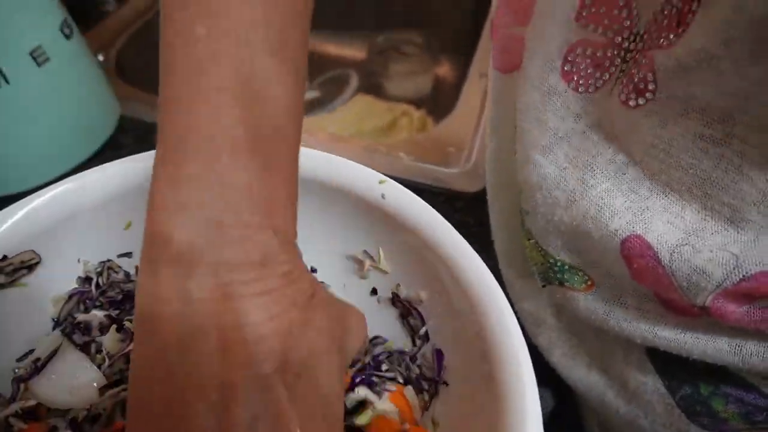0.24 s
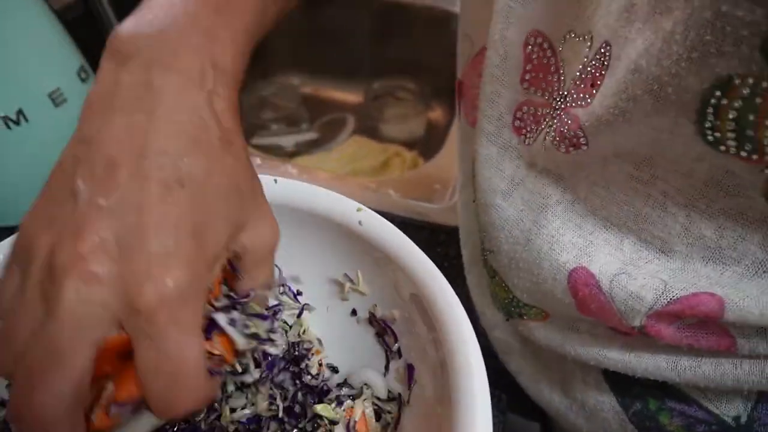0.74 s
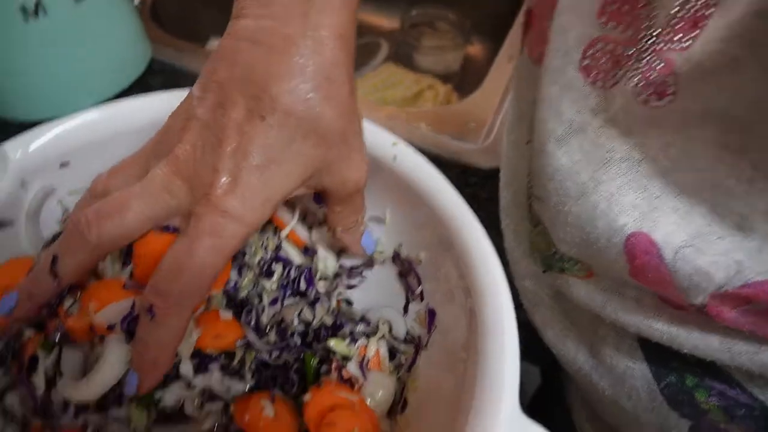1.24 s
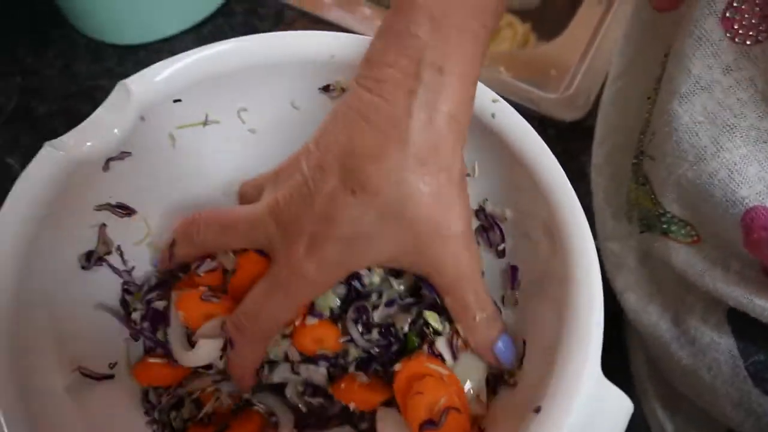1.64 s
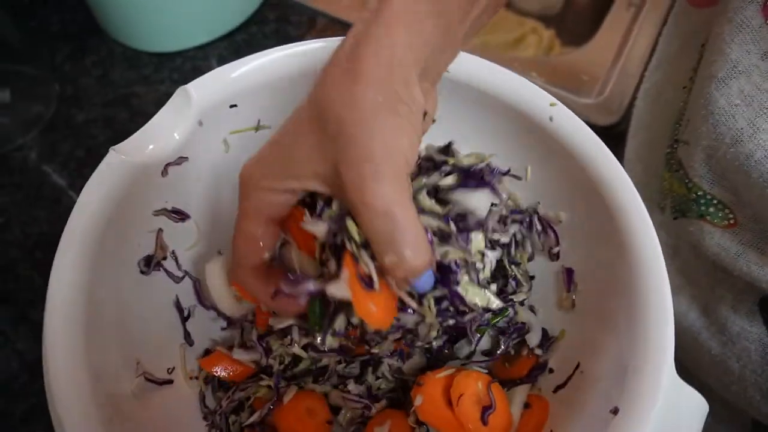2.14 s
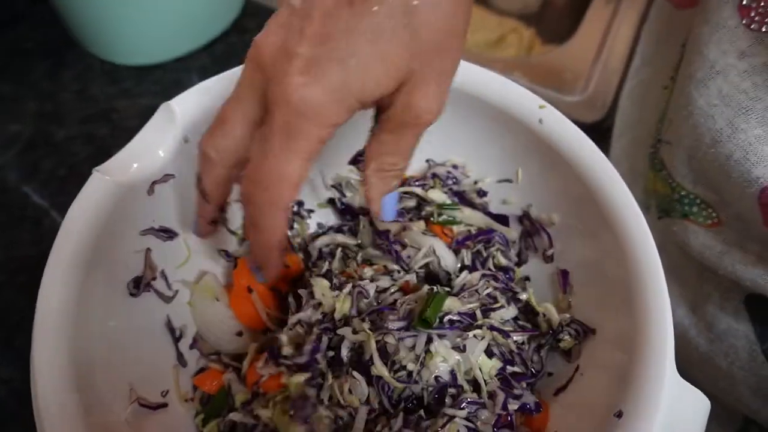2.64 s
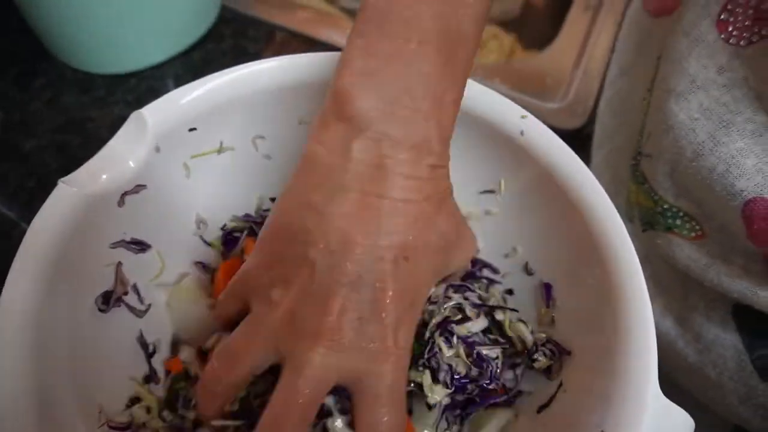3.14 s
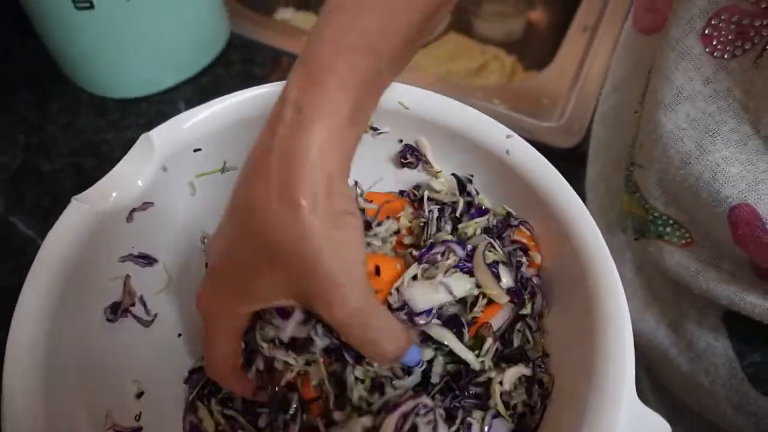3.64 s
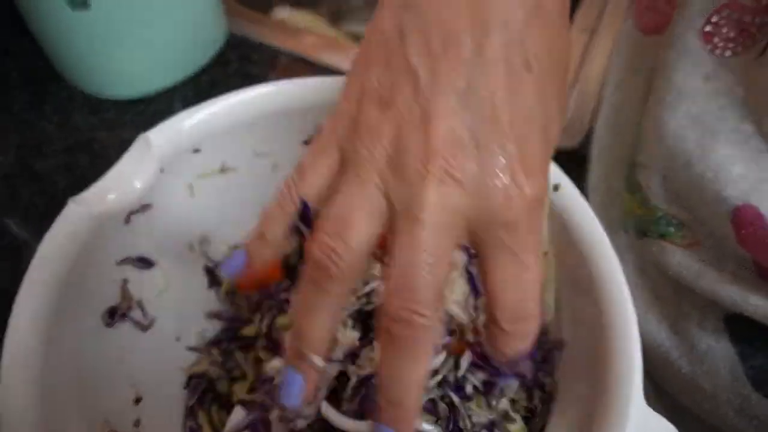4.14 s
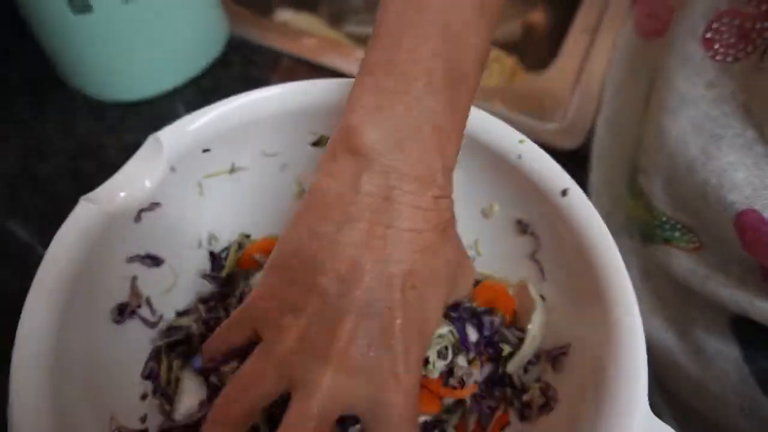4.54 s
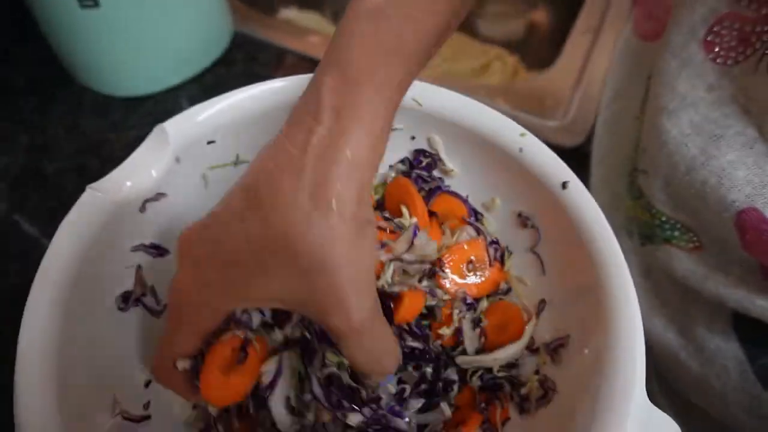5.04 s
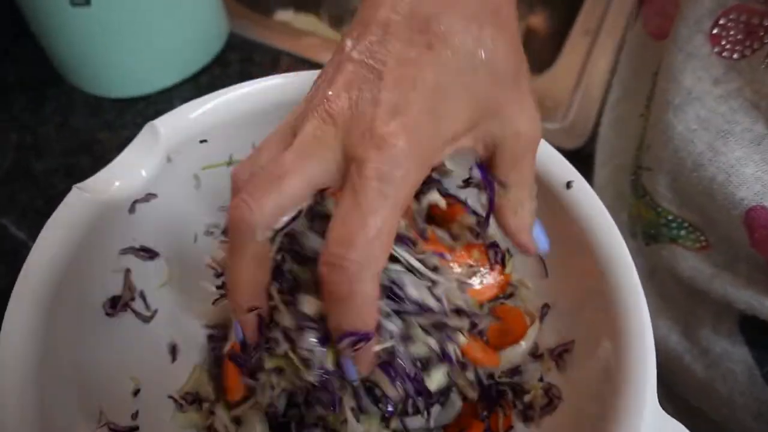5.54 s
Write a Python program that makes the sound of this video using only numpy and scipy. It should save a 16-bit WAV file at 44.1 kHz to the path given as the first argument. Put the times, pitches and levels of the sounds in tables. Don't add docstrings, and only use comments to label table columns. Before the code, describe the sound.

Close-up crunching of damp shredded vegetables: a squeeze almost at once, a second near two seconds, a long hard one around three and a half, and a short sharp one before five. Between them shreds drop lightly and fingers brush the heap. Soft plastic knocks, short indoor reflections, quiet room noise.

```python
import sys
import numpy as np
from scipy import signal
from scipy.fft import rfft, irfft, next_fast_len
from scipy.io import wavfile

SR = 44100
rng = np.random.default_rng(int(sys.argv[2]) if len(sys.argv) > 2 else 0)


def rack_gain(trim_db):
    fader = np.asarray(trim_db, float)
    return 10 ** (fader / 20)


def transcribe(u):
    v = np.clip(np.atleast_2d(u).T, -1, 1)
    q = np.round(v * 32767).astype(np.int16)
    wavfile.write(sys.argv[1], SR, q)


N = 255899
FIRM_GRIP_DB = -40.5
REST_HOLLOW_HZ = 2010


def rms_one(x):
    return x / np.sqrt(np.mean(x ** 2) + 1e-20)


def at_hz(points, hz):
    point_hz, point_db = np.transpose(points)
    return np.interp(np.log(hz), np.log(point_hz), point_db)


def drift(rate):
    r = np.exp(-16 * np.pi * rate / SR)
    white = rng.standard_normal(N // 8 + 4002)
    slow = signal.lfilter([1], [1, -2 * r, r * r], white)[4000:]
    return np.interp(np.arange(N) / 8, np.arange(len(slow)), rms_one(slow))


def resonate(x, hz, width_hz):
    r = np.exp(-np.pi * width_hz / SR)
    poles = [1, -2 * r * np.cos(2 * np.pi * hz / SR), r * r]
    return signal.lfilter([(1 - r * r) / 2, 0, (r * r - 1) / 2], poles, x + 1e-18)


def stereo(mid, side):
    return np.array([mid + side, mid - side])


def add(out, s, peak_db, sound):
    at = round(s * SR)
    piece = sound[..., max(-at, 0):N - at]
    start = max(at, 0)
    out[..., start:start + piece.shape[-1]] += piece * rack_gain(peak_db) / (np.abs(sound).max() + 1e-12)


def rustle(cracks_per_s, size_db, clump_db, cycles, hollow_db):
    # (frequency [Hz], level [dB per Hz])
    spectrum = [(260, -46), (450, -2.5), (679, -15), (1100, 0.5), (1220, 0), (2010, 7.5), (3210, 3.5),
                (4310, 0), (15000, -39.5)]
    # (frequency [Hz], side minus mid [dB])
    crack_spread = [(60, -22), (180, -20), (550, -25), (1650, -23), (4970, -11.5), (15000, -1.5)]
    pitches = np.geomspace(620, 14500, num=28)
    at = np.flatnonzero(rng.random(N) < cracks_per_s / SR)
    level_db, heavy_db, fine_db, hollow_hz = grip(at / SR)
    fine_db = np.maximum(fine_db, -21)
    lightness_db = np.clip(FIRM_GRIP_DB - level_db, 0, 14)
    hollow_db = hollow_db - 0.5 * (fine_db + 12.0) + 0.097 * lightness_db
    clump_db = clump_db * clumps(per_s=98.0, fade_ms=6.8)[at]
    size_db = size_db * np.minimum(rng.exponential(1, N), 4)[at]
    sign = rng.choice([-1, 1], N)[at]
    place = rng.standard_normal(N)[at]
    dealt = rng.integers(0, len(pitches), N)[at]
    patches = [drift(16)[at] for k in range(6)]
    out = 0
    for k, hz in enumerate(pitches):
        heavy = np.clip(np.log2(hollow_hz / hz), 0, 1)
        fine = np.clip(0.81 * np.log2(hz / 3000), 0, 1)
        shaken = np.abs(dealt - k) <= 2
        cracks = shaken * sign * rack_gain(size_db + clump_db + 1.2 * patches[k // 2 % 6])
        grip_db = level_db + heavy * (heavy_db + 14.0) + fine * (fine_db + 14.0) + at_hz(spectrum, hz)
        grip_db = grip_db + hollow_db * np.exp(-(np.log2(hz / hollow_hz) / .2) ** 2)
        side = place * rack_gain(at_hz(crack_spread, hz))
        pair = np.zeros((2, N))
        pair[:, at] = rms_one(cracks) * rack_gain(grip_db) * stereo(0.74, side)
        band = signal.butter(2, [hz / 1.13, hz * 1.211], "band", fs=SR, output="sos")
        out = out + signal.sosfilt(band, resonate(pair, hz, hz / cycles))
    return out * rack_gain(9.0) * np.sqrt(SR / cracks_per_s)


def clumps(per_s, fade_ms):
    starts = (rng.random(N) < per_s / SR) * np.minimum(rng.exponential(1, N), 2.5)
    fading = signal.lfilter([1], [1, -np.exp(-1000 / (fade_ms * SR))], starts)
    surge = np.log(0.63 + fading)
    return rms_one(surge - surge.mean())


def grip(at_s):
    # (time [s], rustle level [dB], hollow under the hand [Hz])
    first_squeeze = [(0.15, -72, 2200), (0.225, -55.5, 2150), (0.265, -43, 2070), (0.4, -36.5, 1920),
                     (0.53, -45.5, 2000), (0.64, -64, 2250), (0.74, -67.5, 2300), (0.8, -69, 2200),
                     (1.0, -85, 2040)]
    second_squeeze = [(1.5, -65.5, 1900), (1.679, -44, 1980), (1.76, -51, 1710), (1.826, -42.5, 1850),
                      (1.86, -35.5, 1990), (1.96, -41.5, 1820), (2.119, -53.5, 2000), (2.19, -55, 2080),
                      (2.46, -72.5, 1990)]
    third_squeeze = [(3.005, -80, 1890), (3.049, -61.5, 1680), (3.15, -44.5, 2160), (3.38, -38.5, 1880),
                     (3.469, -34.5, 1680), (3.6, -46, 1630), (3.7, -53, 1600), (3.84, -75.5, 1660),
                     (3.969, -70.5, 2120)]
    fourth_squeeze = [(4.25, -102, 1850), (4.42, -54, 1970), (4.7, -46.5, 2080), (4.767, -41, 1920),
                      (4.79, -33, 2110), (4.867, -41.5, 1600), (5.09, -52.5, 1580), (5.13, -60.5, 2130),
                      (5.37, -75, 2070)]
    # (heavy wet pieces [dB above rustle], fine dry shreds [dB above rustle],
    # dulling once crushed [dB per s])
    handfuls = [
        (-15, -10, 1),
        (-12, -10, 12),
        (-22, -10, 63),
        (-15.5, -14, 10.5),
    ]
    # (touch [s], rustle level [dB], time to fall 20 dB [s], hollow [Hz],
    # fine shreds [dB above rustle])
    brushes = [(0.031, -51.5, 0.07, 2300, -31), (0.17, -53, 0.32, 2200, -14),
               (0.602, -49.5, -0.0854, 2260, -11), (0.675, -61, 0.04, 2300, -14),
               (0.73, -70, -0.35, 2300, -4), (0.94, -69, -0.9, 2200, -10), (1.133, -55, 0, 2070, -28),
               (1.169, -61, -0.26, 2090, -22), (1.224, -57, -0.79, 1990, -17),
               (1.572, -51, 0.97, 2200, -16), (1.71, -37.5, 0.01, 2200, -10.5),
               (2.17, -54.5, 0.17, 2120, -9), (2.647, -58, 0.05, 2200, -46), (4.548, -47, 0.3, 2120, -14),
               (0.12, -56.5, 0.64, 2320, -15), (0.818, -62, 0.28, 1700, -17), (0.901, -70, 0.26, 2080, -12),
               (1.084, -64, 0, 2080, -15), (1.112, -59, 0, 1940, -26), (1.197, -57.5, -0.06, 1940, -31),
               (1.467, -57.5, 0.15, 1800, -26.5), (2.32, -62.5, 0.64, 2140, 9.5),
               (2.518, -53.5, 0.08, 1830, -1), (2.589, -54, 0, 2100, -40),
               (2.612, -44.5, 0.0661, 2100, -10), (2.77, -63, -1.7, 2160, -21),
               (2.882, -63.5, 0, 1840, -15), (3.003, -50, 0.96, 1760, -12), (3.705, -50, 0.105, 1750, -14),
               (3.929, -60, 0, 2170, -2), (4.014, -58, 0.11, 1910, -3), (4.099, -57, 0, 2020, -10),
               (4.328, -62, 0.5, 1870, -20), (5.46, -65, 0.65, 1900, -5.5), (5.601, -57, 0.05, 1740, 6),
               (5.716, -67, -0.25, 2120, -11), (5.8, -71, 2, 2000, -15)]
    t = np.arange(0, N / SR + .002, .001)
    steady = np.ones(len(t))
    # level, heavy and fine shares [dB], hollow [Hz]
    parts = [(-77 * steady, -19 * steady, -9 * steady, REST_HOLLOW_HZ * steady)]
    squeezes = (first_squeeze, second_squeeze, third_squeeze, fourth_squeeze)
    for curve, (heavy_db, fine_db, dull_db) in zip(squeezes, handfuls):
        s, db, hz = np.transpose(curve)
        level_db = np.interp(t, s, db, left=-150, right=-150)
        firm_db = level_db - FIRM_GRIP_DB
        crushed_s = np.maximum(t - s[np.argmax(db)], 0)
        heavy_db = heavy_db + 0.26 * firm_db
        fine_db = fine_db - 0.15 * firm_db - dull_db * crushed_s
        parts.append((level_db, heavy_db, fine_db, np.interp(t, s, hz)))
    for s, db, fall_s, hz, fine_db in brushes:
        rise_s = 0.028
        level_db = db - 20 * np.where(t < s, (s - t) / rise_s, (t - s) / max(fall_s, .005))
        heavy_db = -18 - 35 * np.log2(hz / REST_HOLLOW_HZ)
        parts.append((level_db, heavy_db * steady, fine_db * steady, hz * steady))
    level_db, *colour = np.transpose(parts, (1, 0, 2))
    power = rack_gain(2 * level_db)
    total = power.sum(axis=0)
    mixed = [10 * np.log10(total)] + [(power * c).sum(axis=0) / total for c in colour]
    return [np.interp(at_s, t, c) for c in mixed]


def snaps():
    # (frequency [Hz], width [Hz], level [dB])
    bowl_air = [(2200, 56, 31.5), (3320, 150, 2), (4230, 100, -5), (1600, 650, 9.5)]
    out, lead_s = np.zeros((2, N)), .012
    ms = 1000 * (np.arange(2200) / SR - lead_s)
    after = ms >= 0
    for s, peak_db, hz, crack_db, rise_ms, fall_ms in strands():
        draw = rng.standard_normal((3, len(ms)))
        shape_db = -8. * np.where(ms < 0, -ms / max(rise_ms, .05), ms / max(fall_ms, .1))
        volley = draw[0] * rack_gain(1.94 * np.clip(draw[1], -3, 1.5) + shape_db)
        volley[np.argmax(after)] *= 2.2 / abs(draw[0, after][0])
        body = rms_one(resonate(resonate(volley, hz, hz / 4), hz, hz))
        air = 0
        for k, (air_hz, width_hz, db) in enumerate(bowl_air):
            air = air + rack_gain(db) * resonate(volley, air_hz, width_hz) * (-1) ** k
        crack = resonate(resonate(volley, 4100, 3800), 5150, 4600)
        lean = np.clip(draw[2, :2], -1.5, 1.5)
        low = signal.sosfilt(snap_band(hz), body + 0.33 * rms_one(air))
        add(out, s - lead_s - .0006, peak_db - 3.5, stereo(low, 0.15 * lean[0] * low))
        add(out, s - lead_s, peak_db + crack_db + 1.5, stereo(crack, lean[1] * np.roll(crack, 1)))
    return out


def strands():
    # (time [s], peak [dB], ring [Hz], fall [ms])
    breaks = [(0.1086, -27.5, 2270, 3), (0.192, -32.5, 2680, 2.3), (0.246, -28, 2250, 2.7),
              (0.2612, -21, 1950, 1.9), (0.3691, -18, 1830, 5), (0.396, -25.5, 3550, 1.7),
              (0.4999, -17, 2420, 4), (0.5225, -21.5, 3150, 0.85), (1.1209, -36.5, 1870, 0.3),
              (1.198, -57, 2190, 0.53), (1.8, -29, 2270, 1.4), (1.9464, -17.5, 2150, 0.25),
              (1.978, -25, 3500, 1.3), (2.002, -29, 1820, 8.5), (2.0852, -29, 3120, 0.72),
              (2.771, -43.5, 2330, 4.2), (3.0725, -34, 1730, 37), (3.336, -18.5, 1820, 3.3),
              (3.408, -21.5, 2720, 1.5), (3.4571, -18, 3200, 7), (3.472, -19.5, 2090, 1.1),
              (3.5198, -26, 1600, 42), (3.5396, -19, 1910, 0.58), (3.616, -35, 1790, 0.33),
              (3.6393, -19, 1850, 0.3), (3.9348, -39.5, 2080, 1.7), (4.664, -23, 1830, 2.7),
              (4.78, -24, 2560, 3.1), (4.891, -45, 1940, 3.5), (5.0025, -31.5, 2850, 4.7)]
    # (time of peak [s], peak [dB], ring [Hz], rise [ms], fall [ms])
    tears = [(0.0278, -28, 2230, 1.6, 3.5), (0.2896, -24.5, 2000, 5.1, 1.9),
             (0.3233, -21.5, 2200, 2.9, .57), (0.599, -40.5, 2360, 1.2, 1.2),
             (0.8216, -39, 1630, 2.9, 0.53), (0.9238, -45.5, 2200, 4.1, 0.53), (1.872, -30, 2980, 3.5, .6),
             (1.9119, -23, 3300, 8.3, 5.6), (2.4033, -44, 1890, 1.3, 2.6), (2.6087, -28, 2520, 0.35, 2.5),
             (2.618, -26.5, 2350, 1.2, 1.8), (2.8834, -44.5, 1930, 0.98, 0.58),
             (3.114, -27.5, 2120, 1.2, .7), (3.2394, -28.5, 2380, 0.91, 4), (3.261, -41, 2160, 3.2, 3.9),
             (3.309, -24, 1900, 0.64, 0.94), (3.382, -25, 2310, 1.4, .4), (3.431, -14.5, 4100, 4.2, 5.5),
             (4.1204, -36, 2380, 2.6, 0.78), (4.298, -42, 2120, 0.79, 2.8), (4.7112, -28, 2560, 1.4, 8.2),
             (4.832, -28, 2500, 1.8, 2.1), (4.9235, -26, 1740, 0.77, 1.1), (4.9447, -28, 3530, 3.9, 0.97)]
    # (time [s], peak [dB], ring [Hz], crack [dB above peak], fall [ms])
    ticks = [(0.0056, -39.5, 2200, -9, 6), (0.297, -28.5, 5200, -12, 14), (0.764, -46.5, 3000, -18, 2.3),
             (1.325, -54, 9300, -22, 1.1), (1.836, -22, 3320, -9, 0.97), (1.853, -27.5, 4400, -6, 0.71),
             (1.936, -37, 4040, -37, 0.36), (2.055, -36.5, 2260, -7, 3.1), (2.2211, -40, 3500, -10, 1.8),
             (2.319, -38.5, 2100, -6.5, 1.9), (2.335, -40, 2100, -12, 3.8), (2.4749, -35, 2780, -4.5, 1.6),
             (2.5233, -42, 4120, 4.5, 1.5), (3.1460, -17.5, 2490, -6.5, 5.9), (3.78, -45, 1600, -2.5, 3),
             (3.797, -43, 4770, -18, 3.5), (4.1078, -50, 1950, -13, 5.6), (4.582, -37.5, 2250, -1, 0.76),
             (4.7006, -25.5, 2680, -13, 4), (4.773, -29, 3020, -13, 0.53), (5.2473, -35.5, 2170, -15, 4.1),
             (5.498, -49.5, 6500, -3, 2.9), (5.599, -42, 3080, 6, 2.2), (5.625, -45, 5600, -2, 4.4)]
    # (time [s], peak [dB], ring [Hz])
    landings = [(0.2793, -35, 6800), (0.717, -50, 3880), (0.732, -45.5, 3630), (1.4975, -55.5, 7500),
                (1.984, -32, 3470), (2.136, -35, 2870), (2.264, -46.5, 6000), (3.7, -57.5, 8000),
                (2.63, -31.5, 2280), (2.7357, -51, 3370), (3.1295, -33, 2150), (3.893, -44.5, 2200),
                (3.3, -52, 1800), (4.6205, -30, 2640), (4.6414, -40, 2530), (5.023, -41, 6560),
                (5.387, -52, 2980), (5.4607, -47, 1861), (5.4715, -49, 3950), (5.512, -40, 3640),
                (5.713, -46.5, 2800), (5.8008, -43, 2630)]
    break_rise_ms = 0.15
    rows = [(s, db, hz, -34, break_rise_ms, fall) for s, db, hz, fall in breaks]
    rows += [(s, db, hz, -33, rise, fall) for s, db, hz, rise, fall in tears]
    rows += [(s, db, hz, crack, break_rise_ms, fall) for s, db, hz, crack, fall in ticks]
    for s, db, hz in landings:
        crack_db = -14 - 16 * np.log2(hz / REST_HOLLOW_HZ)
        rows.append((s, db, hz, crack_db, break_rise_ms, 2.9))
    return rows


def snap_band(hz):
    return signal.butter(2, [900, max(6000, 0.8 * hz)], "band", fs=SR, output="sos")


def pops():
    # (time [s], peak [dB], ring [Hz])
    fibre_pops = [(0.0053, -51, 2130), (0.0091, -34, 2200), (0.0642, -55, 2130), (0.1705, -39, 3160),
                  (0.3094, -29, 2240), (0.3266, -30, 2290), (0.373, -29, 2220), (0.3987, -19.5, 3560),
                  (0.5626, -39, 2800), (0.814, -43.5, 2970), (1.1036, -42, 1870), (1.1108, -48, 1940),
                  (1.129, -45, 2000), (1.1739, -51, 2040), (1.1976, -49, 2150), (1.2074, -47, 2130),
                  (1.2181, -49, 2050), (1.2271, -53, 2020), (1.6596, -29, 2500), (1.712, -36, 1750),
                  (1.8698, -25.5, 3250), (1.927, -25, 2110), (1.9362, -36, 4000), (1.9414, -23.5, 3230),
                  (1.9918, -31, 2390), (2.0913, -37, 2640), (2.5002, -43, 2250), (2.6446, -39, 3180),
                  (2.6531, -40.5, 2300), (2.781, -57, 2300), (3.0018, -36, 3460), (3.2041, -31, 2150),
                  (3.2395, -34, 2400), (3.2592, -30, 2240), (3.3969, -29, 2650), (3.4175, -26, 2970),
                  (3.4365, -14, 2870), (3.4692, -18, 2060), (3.4964, -30, 1670), (3.6144, -28, 1700),
                  (3.67, -35, 1910), (3.6925, -42, 2110), (3.9401, -43.5, 2230), (4.2547, -52.5, 1840),
                  (4.3547, -45, 1830), (4.5829, -40, 2670), (4.6425, -35, 1850), (4.7052, -38, 2740),
                  (4.7613, -37, 3020), (4.7725, -35, 2950), (4.7787, -26, 2600), (4.8897, -28, 1800),
                  (4.993, -35.5, 1910), (5.0002, -30.5, 1740), (5.0354, -40, 1940), (5.749, -51, 2240),
                  (5.7992, -58, 1940)]
    # (time [s], peak [dB], ring [Hz])
    fibre_pricks = [(0.0063, -48.5, 5490), (0.1086, -42, 4640), (0.1121, -51, 4760), (0.599, -48, 5120),
                    (0.7619, -61, 5770), (0.8187, -57, 9450), (0.9472, -53.5, 4820), (1.0826, -50, 4500),
                    (1.7227, -45, 4640), (1.8362, -35, 4700), (1.8531, -25.5, 4500), (2.0557, -43, 5430),
                    (2.0933, -50, 5430), (2.3131, -52, 6100), (2.4159, -50.5, 6910), (2.6162, -35.5, 4770),
                    (2.7059, -56, 5040), (2.884, -54, 4470), (3.1312, -32, 5960), (3.2001, -31.5, 4500),
                    (3.3373, -29.5, 4720), (3.5545, -44, 5750), (3.7054, -56, 5320), (3.8553, -53, 4870),
                    (3.8838, -53, 4850), (3.9342, -46, 4640), (3.9509, -54, 4960), (4.1065, -51, 6560),
                    (4.2968, -55, 4900), (4.6001, -49, 5000), (4.642, -37, 4500), (4.646, -44, 5430),
                    (4.7054, -37, 5400), (4.7089, -31.5, 4770), (4.7613, -40, 4500), (4.7725, -29, 5120),
                    (4.8311, -32.5, 4970), (4.8526, -42, 6070), (4.8927, -41, 4750), (5.0224, -45, 5460),
                    (5.1452, -52, 4770), (5.215, -51, 5260), (5.3534, -59, 5400), (5.3829, -54.5, 6540),
                    (5.551, -57, 10800), (5.5989, -37.5, 9800), (5.6755, -53, 6760)]
    out, ms = np.zeros((2, N)), 1000 * np.arange(500) / SR
    kinds = ((fibre_pops, 6.8, -2, 0.15), (fibre_pricks, 6.4, 1.5, 0.6))
    for rows, cycles, trim_db, spread in kinds:
        for s, peak_db, hz in rows:
            draw = rng.standard_normal(len(ms) + 1)
            click = 0.36 * draw[1:] * np.exp(-ms / 0.52)
            click[0] = 1.27
            ring = resonate(resonate(click, hz, hz / cycles), hz, 0.72 * hz)
            ring = resonate(ring, hz, 1.75 * hz)
            side = spread * np.clip(draw[0], -1.5, 1.5) * np.roll(ring, 1)
            add(out, s, peak_db + trim_db, stereo(ring, side))
    return out


def slides():
    # (time [s], length [s], peak [dB], hollow [Hz])
    finger_slides = [
        (0.03, 0.054, -51, 2200),
        (0.112, 0.21, -42, 2200),
        (0.816, 0.068, -54, 1980),
        (2.156, 0.057, -47.5, 2150),
        (2.175, 0.025, -43.5, 3560),
        (2.244, 0.033, -54, 2120),
        (3.693, 0.042, -41, 1740),
        (4.801, 0.028, -27, 1420),
        (4.789, 0.03, -27, 2650),
        (5.04, 0.051, -48, 1620),
    ]
    out = np.zeros((2, N))
    slips_per_s, width_hz = 900., 270
    for s, length_s, peak_db, hz in finger_slides:
        draw = rng.random((2, 8000))[:, :round(length_s * SR)]
        slips = (draw[0] < slips_per_s / SR) * (2 * draw[1] - 1)
        slips = slips * signal.windows.tukey(draw.shape[1], 0.3)
        squelch = resonate(resonate(slips, hz, width_hz), hz, 2 * width_hz)
        add(out, s, peak_db, stereo(squelch, 0.091 * np.roll(squelch, 3)))
    return out


def knocks():
    # (time [s], peak [dB], strongest ring [Hz], counter thud [dB above peak],
    # fall of other modes [dB per octave])
    blows = [(0.259, -31, 1140, -44, 7.5), (0.316, -47, 557, -52, 15), (0.369, -25.5, 1140, -62, 10.5),
             (0.544, -57, 297, -49, 7), (0.967, -61.5, 385, -16, 29), (2.053, -48, 1050, -53, 35),
             (2.263, -56.5, 627, -48, 12), (2.337, -58, 613, -47, 38), (2.524, -41.5, 673, -54, 49),
             (2.618, -62.5, 388, -14, 7), (2.884, -58.5, 840, -10.5, 15), (2.998, -49.5, 374, -22, 10),
             (3.013, -43, 355, -10.5, 12), (3.075, -55.5, 500, -40, 25), (3.112, -54.5, 620, -40, 29),
             (3.43, -58, 612, -60, 32), (3.467, -46.5, 1110, -67, 10.5), (3.47, -47, 615, -60, 35),
             (3.515, -52.5, 620, -60, 37), (4.448, -50, 350, -6, -3)]
    # (frequency [Hz], width [Hz], side over mid [ratio])
    wall_modes = [(273, 61, 0.19), (387.5, 15, 0.11), (479, 10.6, 0.41), (537.4, 21, 0.28),
                  (613, 31.6, 0.25), (840, 95, 0.24), (1140, 58, 0.25), (1660, 47, 0.064)]
    out, age = np.zeros((2, N)), np.arange(8000) / SR
    steep = signal.butter(3, 250, "high", fs=SR, output="sos")
    for s, peak_db, spot_hz, thud_db, focus_db in blows:
        blow = rng.standard_normal(len(age)) * rack_gain(-60 * age / .01)
        wall = 0
        for k, (hz, width_hz, side) in enumerate(wall_modes):
            mode = rms_one(resonate(blow, hz, width_hz)) * rack_gain(-focus_db * abs(np.log2(hz / spot_hz)))
            wall = wall + (-1) ** k * stereo(mode, side * np.roll(mode, round(SR / hz / 6)))
        thud = rms_one(resonate(blow, 126, 6.8))
        thud = thud + 0.48 * rms_one(resonate(blow, 79, 5.4))
        thud = thud - 1.4 * rms_one(resonate(blow, 225, 20))
        judder = rng.standard_normal(len(age)) * rack_gain(-60 * age / 0.63)
        thud = resonate(thud + rms_one(resonate(judder, 180, 220)), 140, 230)
        add(out, s, peak_db, signal.sosfilt(steep, wall))
        add(out, s, peak_db + thud_db - 5.5, stereo(thud, 0.025 * thud))
    return out


def rocking(level_db):
    grip_db = grip(np.arange(N) / SR)[0]
    rumble = rms_one(resonate(resonate(rng.standard_normal(N), 94, 120), 66, 160))
    return rumble * rack_gain(level_db + 0.32 * (grip_db + 43) + 2 * drift(7.4))


def kitchen(x):
    t60_s, wall_cut_hz = .2, 5000
    size = next_fast_len(N + SR // 2)
    hz = np.fft.rfftfreq(size, 1 / SR)
    out = np.zeros((2, size // 2 + 1), complex)
    for k, lag_s in enumerate(rng.uniform(.006, .03, 12)):
        absorption = rack_gain(-60 * lag_s / t60_s) / (1 + 1j * hz / wall_cut_hz)
        loop = absorption * np.exp(-2j * np.pi * hz * lag_s)
        out[k % 2] += loop / (1 - loop) * (-1) ** (k // 2)
    return irfft(out * rfft(x, size), size)[:, :N]


def room_tone():
    # (frequency [Hz], level [dB per Hz])
    hiss = [(15, -65), (25, -23), (102, -26), (317, -9), (476, -2.5), (560, -2.5), (863, -8.5), (1230, -6),
            (1890, -24), (2160, -9.5), (4870, -12), (14800, -24), (16000, -35)]
    # (frequency [Hz], side minus mid [dB])
    hiss_spread = [(60, -9), (180, -8), (550, -6), (1650, -6), (4970, -4), (15000, -1)]
    # (frequency [Hz], width [Hz], level [dB])
    drone = (482, 28, -85)
    out, bounds = 0, 22 * 2 ** np.arange(0, 9.6, .5)
    white = rng.standard_normal((2, 2, N))
    for k, (low, high) in enumerate(zip(bounds, bounds[1:])):
        band = signal.butter(2, [low, high], "band", fs=SR, output="sos")
        mid, side = signal.sosfilt(band, white[k % 2])
        hz = np.sqrt(low * high)
        out = out + rack_gain(at_hz(hiss, hz)) * stereo(mid, side * rack_gain(at_hz(hiss_spread, hz)))
    hz, width_hz, db = drone
    hum = resonate(rng.standard_normal((2, N)), hz, width_hz)
    mid, side = rms_one(resonate(hum, hz, width_hz))
    return rack_gain(-68.5 - 5.5) * rms_one(out) + rack_gain(db + 0.13 * drift(9.6)) * stereo(mid, 0.41 * side)


def scene():
    shreds = rustle(cracks_per_s=3500., size_db=0.5, clump_db=1.4, cycles=9.6, hollow_db=2.5)
    bowl = shreds + snaps() + knocks() + pops() + slides()
    near = bowl * rack_gain([[.4], [-.4]]) + rocking(level_db=-100.0)
    thin = signal.sosfilt(signal.butter(2, 500, "high", fs=SR, output="sos"), bowl.mean(axis=0))
    return near + rack_gain(-19) * kitchen(thin) + room_tone()


def roll_off(x):
    return signal.sosfilt(signal.butter(12, 15790, fs=SR, output="sos"), x)


def record(dry):
    dull = signal.sosfilt(signal.butter(2, 13800, fs=SR, output="sos"), dry)
    return roll_off(dull)


dry = scene()
out = record(dry)
transcribe(out)
```